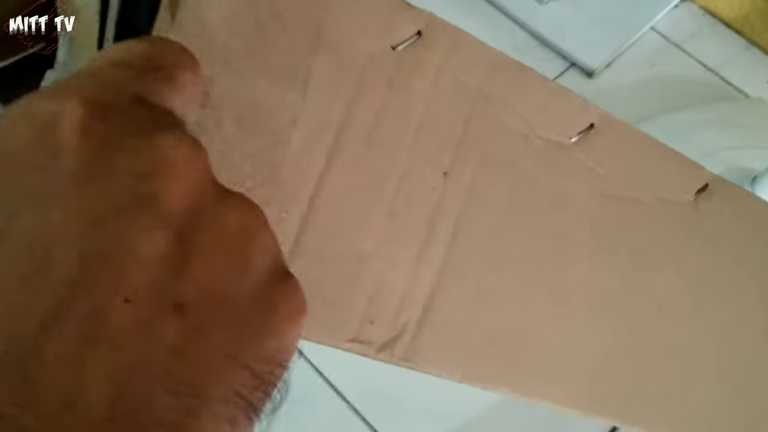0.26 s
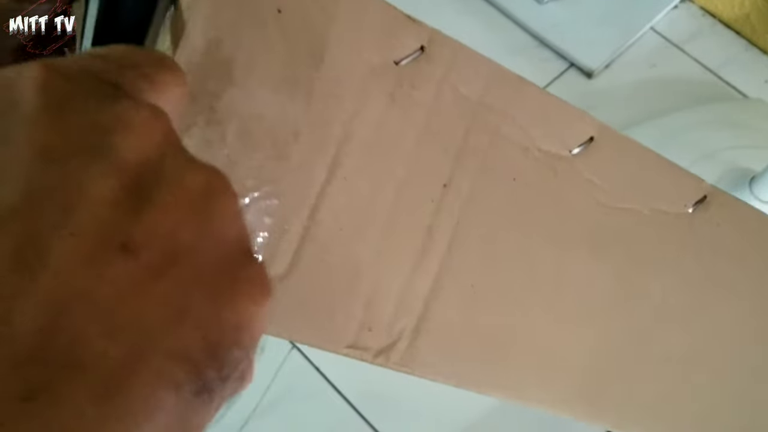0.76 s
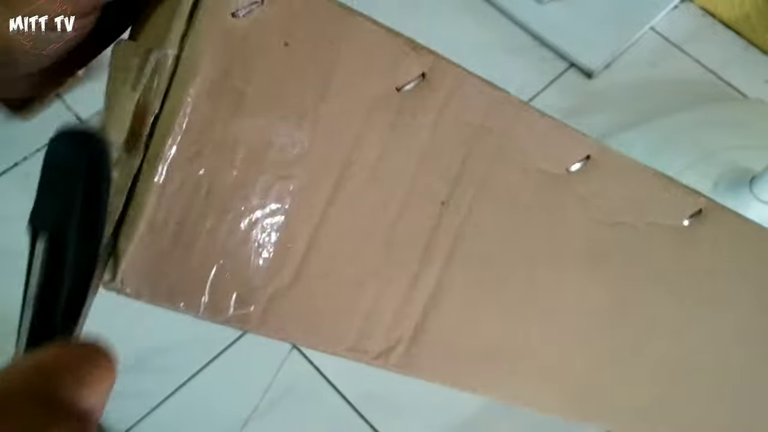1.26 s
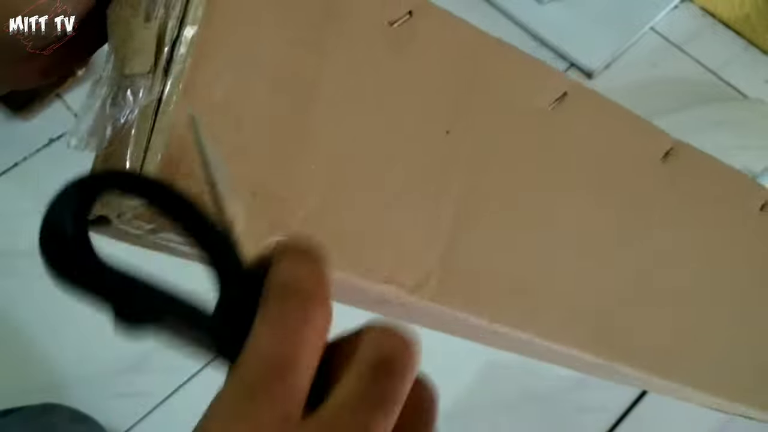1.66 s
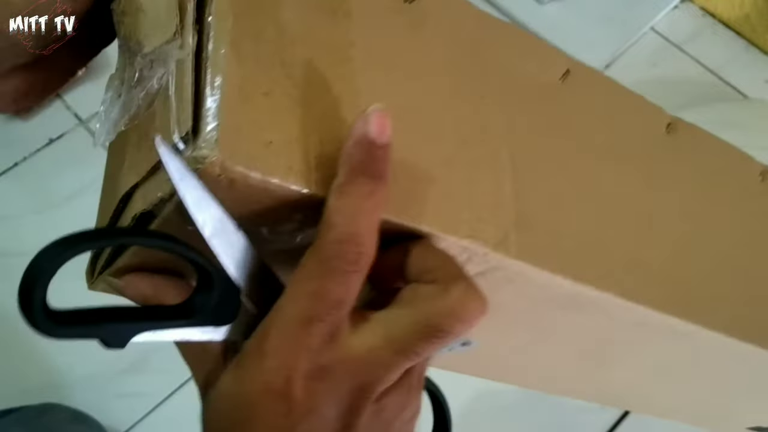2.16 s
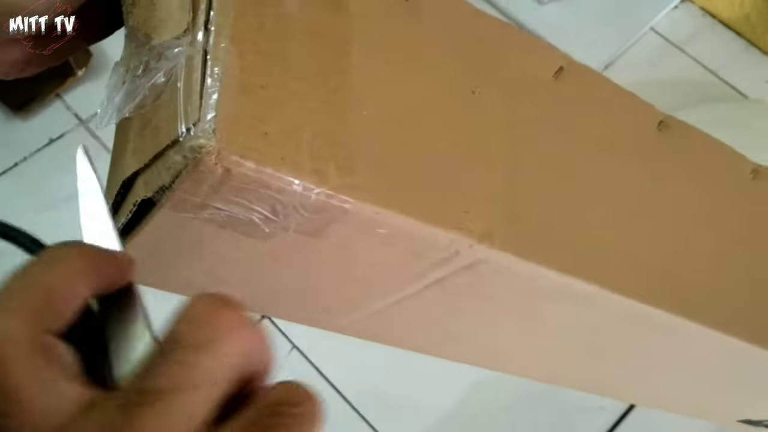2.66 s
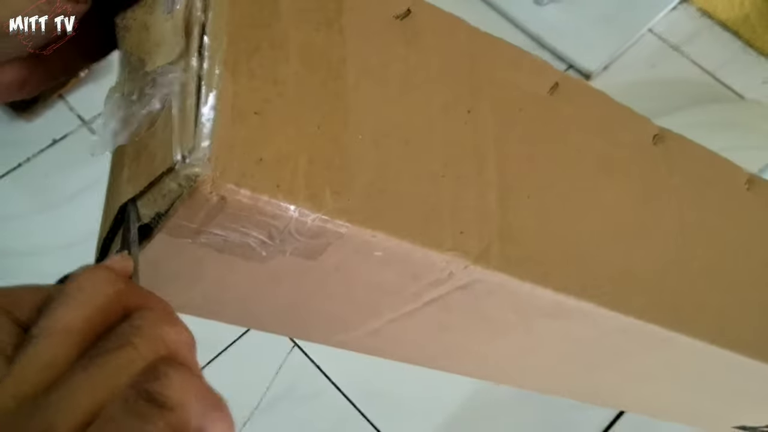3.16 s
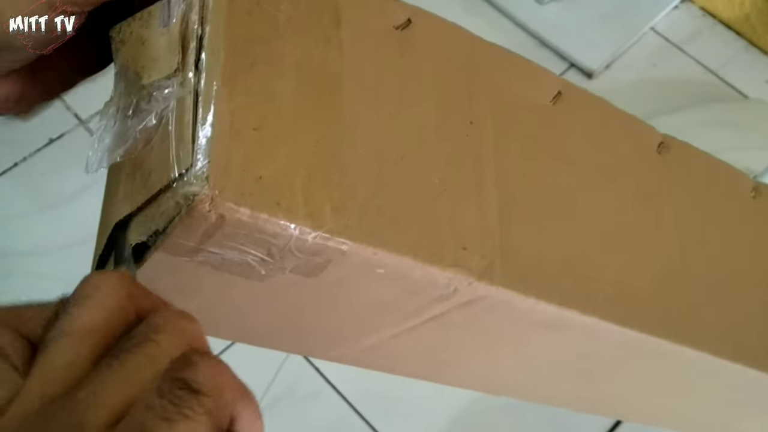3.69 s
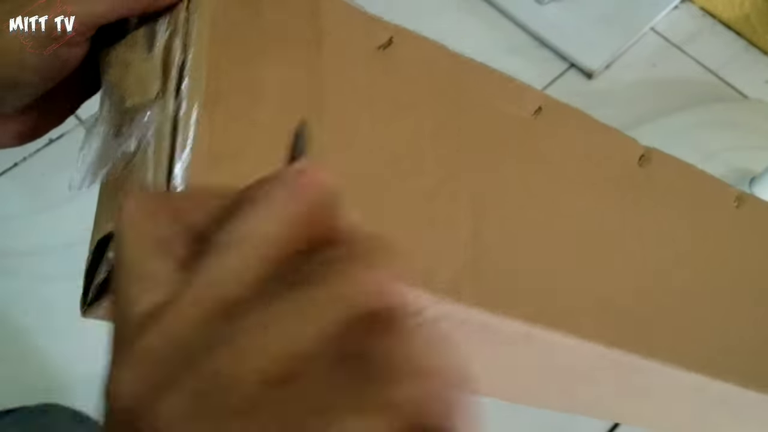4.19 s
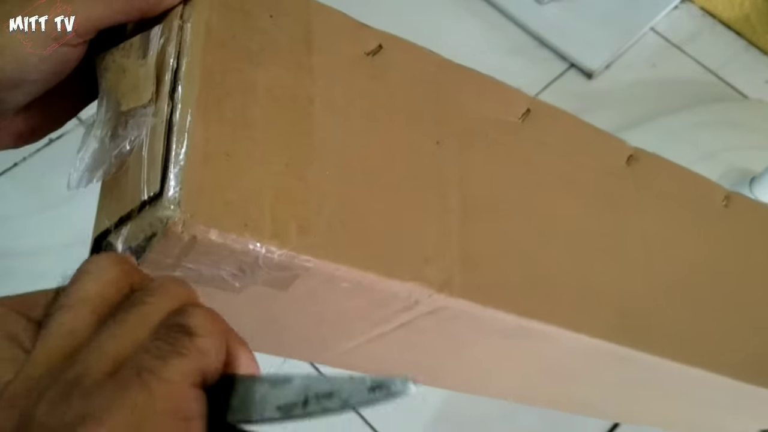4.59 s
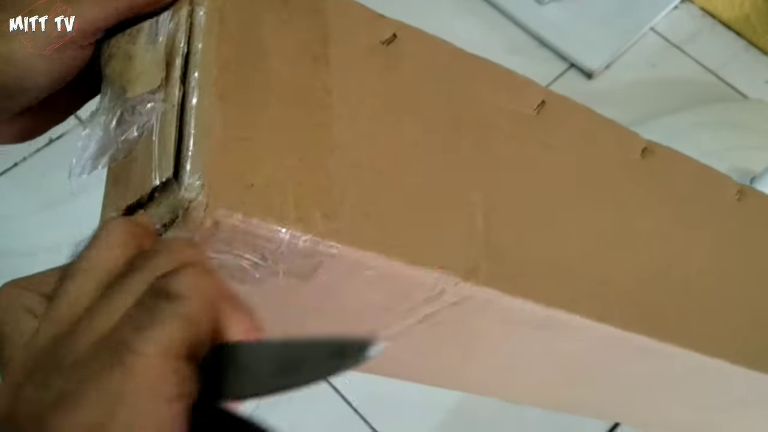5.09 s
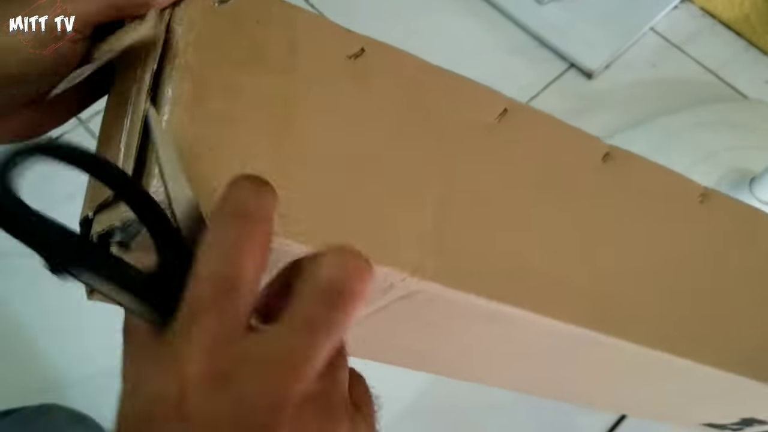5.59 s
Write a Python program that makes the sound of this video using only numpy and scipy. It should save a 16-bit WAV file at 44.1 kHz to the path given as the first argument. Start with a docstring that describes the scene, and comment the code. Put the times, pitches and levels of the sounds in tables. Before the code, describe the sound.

A close handheld microphone hears scissors working on a large, hollow taped carton in a tiled room with a short bright echo. A faint low drone, mains hum and soft hiss run throughout. Small stabs and dull rubs come at 0.3 to 0.8 s. From 0.9 to 1.45 s, quick rasping cuts bring hollow flute pops, crackling tape and a solid thump at 1.35; a sharp steel click follows at 1.5. Lighter clicks lead to a knock near 1.96, then thin crackly scratches until 2.3 and blade clicks at 2.4 and 2.75. Around 3.0 to 3.8 there are only soft bumps and scrapes. At 4.15 to 4.3 a heavy stab booms with a bright tape snap and knocks. Gentle rubs follow, with a click at 4.8 and a small split at 4.9. Another loud thump and snap hits at 5.27, then metallic clicks at 5.45 and 5.54 and a last faint scrape near 5.8.

```python
"""Slitting packing tape on a big cardboard box.

Scissors scrape along the seam in strokes of tiny slips, which rasp in the edge and boom in the hollow box.
All strokes share one envelope; their force sets the rasp, the boom and the crackle of the tape.
Noise bursts snap the tape, ringing modes make the knocks and stabs, short pulses the clicks and flute pops.
A tiled room answers with shifting echoes, over a faint drone, hum and hiss; a hand-held camera listens close."""
import sys
import numpy as np
from scipy import signal
from scipy.fft import rfft, irfft, next_fast_len
from scipy.io import wavfile
from scipy.ndimage import map_coordinates

SR = 44100
rng = np.random.default_rng(int(sys.argv[2]) if len(sys.argv) > 2 else 0)


def persist_wave(psi):
    """Save psi, clipped to +-1, as 16-bit WAV."""
    counts = np.round(np.clip(psi, -1, 1) * 32767).astype(np.int16)
    wavfile.write(sys.argv[1], SR, np.atleast_2d(counts).T)


N = 257984  # length in samples


def amp(db):
    """Decibels to gain."""
    return 10 ** (np.asarray(db) / 20)


def unit(x):
    """Scale to rms 1."""
    return x / np.sqrt(np.mean(x ** 2) + 1e-20)


def along(points, hz):
    """Read (Hz, value) points on a log frequency axis."""
    point_hz, values = np.transpose(points)
    return np.interp(np.log(hz + 1), np.log(point_hz), values)


def wobble(rate):
    """A smooth random curve with rate knots a second."""
    knots = rng.standard_normal(int(N * rate / SR) + 4)
    return map_coordinates(knots, [np.arange(N) * rate / SR])


def filtered(x, response):
    """Shape x by a complex response of frequency."""
    n = x.shape[-1]
    size = next_fast_len(n + 8192)
    return irfft(rfft(x, size) * response(np.fft.rfftfreq(size, 1 / SR)), size)[..., :n]


def softened(x, hz):
    """A soft contact passes little above hz."""
    return signal.lfilter(*signal.butter(2, hz, fs=SR), x)


def impulse(spectrum, stretch=1, size=1024):
    """The shortest causal pulse of energy 1 with this spectrum, stretched along the frequency axis."""
    hz = np.fft.rfftfreq(size, 1 / SR) / stretch
    cepstrum = irfft(np.log(amp(along(spectrum, hz))))
    # folding the cepstrum onto positive time makes the pulse minimum phase
    cepstrum[1:size // 2] *= 2
    cepstrum[size // 2 + 1:] = 0
    pulse = irfft(np.exp(rfft(cepstrum)))
    return pulse / np.linalg.norm(pulse)


def add(track, s, db, sound):
    """Mix a sound into the track at s seconds with this peak level."""
    part = track[round(s * SR):][:len(sound)]
    part += amp(db) * sound[:len(part)] / np.abs(sound).max()


def diffuse(pair, spacing):
    """Two unrelated noises become sound from all sides at two ports, spacing metres apart."""
    def turn(hz):
        return np.arccos(np.sinc(2 * hz * spacing / 343)) / 2  # 343 m/s is the speed of sound

    mid, side = filtered(pair, lambda hz: np.array([np.cos(turn(hz)), np.sin(turn(hz))]))
    return np.array([mid + side, mid - side])


# Spectrum of the low drone. Each row: frequency in Hz, relative density in dB per Hz.
DRONE_SPECTRUM = [(20, -64), (36, -15), (47, -19.5), (57, 3.5), (70, -6.5), (88, -5), (120, -15),
                  (200, -15), (400, -23.5), (800, -27.5), (2000, -34.5), (6000, -51)]
# Spectrum of the soft hiss. Each row: frequency in Hz, relative density in dB per Hz.
HISS_SPECTRUM = [(100, -7), (1000, -3), (2500, -2.5), (5000, -9), (8000, -9.5), (11000, -9.5), (15500, -7)]
# How the drone wavers. Each row: time in seconds, level in dB before the drone's trim.
DRONE_LEVEL = [(0, -52), (.62, -55.5), (.9, -50.5), (1.7, -55), (2, -51.5), (2.6, -55.5), (3.35, -57.5),
               (4.07, -54), (4.7, -55.5), (4.9, -52.5), (5.85, -53)]


def background(drone_trim_db=3, hiss_db=-64.0, hiss_follows=0.46, hum_db=-62, hum_hz=100, apart_db=-19):
    """The low, wavering drone of the room, a mains hum and a soft hiss that rises a little with the drone."""
    t = np.arange(N) / SR
    level = np.interp(t, *np.transpose(DRONE_LEVEL))
    # a little noise unrelated between the ports keeps the low drone wide
    air = diffuse(rng.standard_normal((2, N)), spacing=0.2)
    air = air + amp(apart_db) * rng.standard_normal((2, N))
    drone = unit(filtered(air, lambda hz: amp(along(DRONE_SPECTRUM, hz))))
    hiss = diffuse(rng.standard_normal((2, N)), spacing=0.29)
    hiss = unit(filtered(hiss, lambda hz: amp(along(HISS_SPECTRUM, hz))))
    hiss_gain = amp(hiss_db + hiss_follows * (level - level.mean()) + 0.5 * wobble(3.57))
    hum = unit(np.sin(2 * np.pi * hum_hz * t + 0.5 * wobble(3.17)))
    hum_gain = amp(hum_db + wobble(3.6))
    return amp(drone_trim_db + level) * drone + hiss_gain * hiss + hum_gain * hum


# How long the room rings. Each row: frequency in Hz, t60 (time to fall 60 dB) in seconds.
ROOM_DECAY = [(100, 0.63), (500, 0.53), (1500, 0.5), (4500, 0.4), (12000, 0.3)]


def echoes(tail_db=-4, early_db=-8, early_t60=0.059, gap=0.002):
    """One response of the room: early echoes off the tiles, then a tail that dies sooner in the treble."""
    hz, t, bands = signal.stft(rng.standard_normal((2, SR // 2)), SR, nperseg=256)
    decay = amp(-60 * t / along(ROOM_DECAY, hz)[:, None])
    tail = signal.istft(bands * decay, SR, nperseg=256)[1]
    t = np.arange(tail.shape[1]) / SR
    sparse = rng.random(tail.shape) < 0.05
    early = rng.standard_normal(tail.shape) * sparse * amp(-60 * t / early_t60)
    both = amp(tail_db) * tail / np.linalg.norm(tail[0]) + amp(early_db) * early / np.linalg.norm(early[0])
    return np.pad(both, ((0, 0), (round(gap * SR), 0)))


# Tone of the echoes. Each row: frequency in Hz, gain in dB.
ROOM_COLOUR = [(80, -20), (250, -1), (600, -1.5), (1500, -1.5), (4500, -1), (12000, 4.5)]


def room(x, size=8192):
    """Hand and blade keep moving, so each moment meets a new pattern of echoes."""
    wet, padded = np.zeros((2, N + 2 * SR)), np.pad(x, (0, size))
    for i in range(0, N, size // 2):  # overlapping windows cross-fade the patterns
        moment = padded[i:i + size] * np.hanning(size)
        answer = signal.fftconvolve([moment], echoes(), axes=1)
        wet[:, i:i + answer.shape[1]] += answer
    return filtered(diffuse(wet[:, :N], spacing=0.16), lambda hz: amp(along(ROOM_COLOUR, hz)))


LEAD = 8 / SR  # seconds by which direct sound reaches the right port first


def placed(x, right_db):
    """The sound reaches the right port first, and the camera shades the left one in the treble."""
    side = np.array([[-0.5], [0.5]])  # left, right

    def response(hz):
        shift = np.exp(2j * np.pi * hz * LEAD * side)
        return shift * amp(side * right_db * hz / (hz + 700))

    return filtered(x, response)


def glancing(x, db=-8, t60=0.012, lowest_hz=900):
    """Treble glances off the hand and the box face and reaches each port by its own short paths."""
    t = np.arange(SR // 80) / SR
    paths = rng.standard_normal((2, len(t))) * amp(-60 * t / t60) * (t > 2 * LEAD)
    paths /= np.linalg.norm(paths, axis=1, keepdims=True)
    near = signal.fftconvolve(x[None], paths, axes=1)[:, :N]
    return amp(db) * signal.lfilter(*signal.butter(2, lowest_hz, "highpass", fs=SR), near)


# A tap of steel on steel. Each row: frequency in Hz, relative density in dB per Hz.
STEEL_SPECTRUM = [(300, -45), (1500, 3.5), (2600, 6.5), (3800, 10.5), (5200, 2), (6800, -1.5), (9000, 0.5),
                  (11000, -2.5), (15500, -12.5)]
# The blades tap each other. Each row: time in seconds, peak level in dB,
# stretch of the spectrum as a factor (above 1 is brighter).
CLICKS = [(0.224, -47, 0.75), (1.4956, -21.5, 1.04), (1.7218, -39, 0.61), (1.8425, -34.5, 0.94),
          (2.4, -28.5, 1.18), (2.7568, -40.5, 0.96), (3.3254, -44.5, 1.05), (4.7774, -30.5, 1.4),
          (5.12, -33.5, 1.07), (5.176, -37.5, 0.83), (5.4499, -26.5, 1.36), (5.5374, -36.5, 1.2),
          (5.781, -38.5, 1.1)]


def clicks(chatter_db=-24, chatter_t60=0.012):
    """Steel taps steel; the hand damps the ring at once and the loose pivot chatters faintly."""
    out, t = np.zeros(N), np.arange(SR // 30) / SR
    for s, db, stretch in CLICKS:
        chatter = amp(chatter_db - 60 * t / chatter_t60) * rng.standard_normal(len(t))
        contact = (t == 0) + chatter
        add(out, s, db, signal.fftconvolve(contact, impulse(STEEL_SPECTRUM, stretch)))
    return out


# The blade pops through a flute of the corrugation. Each row: time in seconds, peak level in dB, pitch in Hz.
POPS = [(1.027, -49, 950), (1.104, -27.5, 1295), (1.114, -30.5, 1030), (1.2108, -28, 1085),
        (1.3503, -29, 1520), (1.4198, -34, 2400), (1.9635, -37.5, 2005)]


def pops(t60=0.015, roughness_db=-12):
    """A flute gives way in a brief crumple and its stiff wall rings hollow."""
    out, t = np.zeros(N), np.arange(SR // 20) / SR
    for s, db, hz in POPS:
        # the crumple dies twice as fast as the ring
        crumple = (t == 0) + amp(roughness_db - 60 * t / t60 * 2) * rng.standard_normal(len(t))
        ring = np.sin(2 * np.pi * hz * t) * amp(-60 * t / t60)
        add(out, s, db, signal.fftconvolve(crumple, ring))
    return out


# Modes of the box's panels and cavity. Each row: centre frequency in Hz, centre level in dB, t60 in seconds.
BOX_MODES = [(133.2, -19.5, 0.17), (189.3, -16, 0.14), (252, -10, 0.044), (350, -3.5, 0.021),
             (424, -1.5, 0.018), (538, -8.5, 0.022), (573.4, -16.5, 0.066), (685, -14, 0.052),
             (737, -24, 0.12), (860, -15.5, 0.0072), (1400, -6.5, 0.0059)]


def box_ring(scatter_db=1.5, detune=0.028):
    """The box's answer to one push; each place of contact weighs and tunes its modes anew."""
    t, ring = np.arange(SR // 5) / SR, np.zeros(SR // 5)
    for hz, db, t60 in BOX_MODES:
        decay = amp(db + scatter_db * rng.normal() - 60 * t / t60)
        ring += decay * np.cos(2 * np.pi * hz * (1 + detune * rng.normal()) * t)
    return ring / np.linalg.norm(ring)


# Blade and hand bump the box. Each row: time in seconds, peak of the thud in dB, contact brightness in Hz.
KNOCKS = [(1.046, -38, 150), (1.9637, -21.5, 1260), (2.0744, -31.5, 199), (2.4494, -30.5, 1000),
          (3.0471, -39, 1200), (3.111, -35.5, 150), (3.615, -32, 1400), (4.15, -28, 700), (4.212, -19, 144),
          (4.218, -21, 350), (4.2891, -15.5, 615), (5.258, -21.5, 124), (5.2696, -14, 1360),
          (5.288, -22, 114)]


def knocks():
    """Blade and hand bump the box; soft shoves only flex the big panels."""
    out = np.zeros(N)
    for s, thud_db, bright_hz in KNOCKS:
        add(out, s, thud_db, softened(box_ring(), bright_hz))
    return out


# Rasp of the cut edge. Each row: frequency in Hz, relative density in dB per Hz.
EDGE_SPECTRUM = [(200, -46.5), (600, -8.5), (900, 10), (1450, 7), (1900, 5), (2600, 1.5), (4000, -7.5),
                 (9000, -81.5)]
# The tip is jabbed through the liner. Each row: time in seconds, peak of the thud in dB, peak of the crunch in dB.
STABS = [(0.2943, -36.5, -46), (0.747, -43, -39.5), (0.759, -30, -43), (1.1028, -33.5, -27.5),
         (1.2111, -37, -36.5), (1.3505, -20.5, -33), (4.1733, -16, -29), (4.9012, -32, -44),
         (5.2763, -17.5, -36), (5.5683, -29, -36.5)]


def stabs(contact_hz=1000, crunch_t60=0.011):
    """The tip thumps the box and crunches briefly through the liner."""
    out, t, edge = np.zeros(N), np.arange(SR // 20) / SR, impulse(EDGE_SPECTRUM)
    for s, thud_db, crunch_db in STABS:
        add(out, s, thud_db, softened(box_ring(), contact_hz))
        crunch = amp(-60 * t / crunch_t60) * rng.standard_normal(len(t))
        add(out, s, crunch_db, signal.fftconvolve(crunch, edge))
    return out


# The blade is drawn through tape and liner. Each row: start in seconds, length in seconds,
# force in dB, tape hiss over the rasp in dB.
CUTS = [(0.571, 0.033, -57, -12), (0.943, 0.086, -44.5, -8), (1.003, 0.077, -38.5, -9),
        (1.14, 0.1, -49.5, -4.5), (1.231, 0.086, -38, -2.5), (1.307, 0.067, -41.5, -2),
        (1.403, 0.03, -51, -5.5), (1.905, 0.056, -59, 3.5), (2.127, 0.077, -49, -2.5),
        (2.201, 0.077, -50.5, -1), (2.275, 0.27, -58, -3), (2.445, 0.026, -45.5, -0.5),
        (3.095, 0.035, -52.5, -7), (3.629, 0.075, -49, -1.5), (3.734, .11, -41, -6.5),
        (4.171, 0.055, -34.5, -4), (5.25, 0.025, -44.5, 2.5), (5.797, .05, -51, -6.5)]


def crackle(count=2, over_hiss_db=3, spread_db=7.5, stretch=1.2):
    """Small splits of the tape at chance moments of every cut, as (s, peak dB, stretch)."""
    splits = []
    for s, length, force_db, tape_db in CUTS:
        for _ in range(count):
            moment = s + length * rng.beta(2, 2)
            db = force_db + tape_db + over_hiss_db + spread_db * rng.normal()
            splits.append((moment, db, stretch))
    return splits


# A split of the tape. Each row: frequency in Hz, relative density in dB per Hz.
SNAP_SPECTRUM = [(300, 9), (1500, -8), (3000, 10), (4600, 7.5), (6200, 3.5), (9000, 1), (15500, -23.5)]
# The loudest splits of the tape. Each row: time in seconds, peak level in dB,
# stretch of the spectrum as a factor (above 1 is brighter).
SNAPS = [(1.0268, -31.5, 1.8), (1.053, -37, 1.3), (1.2695, -20, 1.4), (1.273, -24.5, 2.2), (1.32, -30, 1.1),
         (2.1374, -31.5, 2), (2.251, -29.5, 2.37), (4.0932, -40, 1.5), (4.171, -26, 2.1),
         (4.1805, -18, 1.32), (4.9054, -32, 0.54), (4.939, -33.5, 1.03), (5.2722, -21, 3), (5.2768, -16, 1)]


def snaps(t60=0.0044):
    """The taut film splits in a burst a few milliseconds long."""
    out, t = np.zeros(N), np.arange(SR // 30) / SR
    for s, db, stretch in list(SNAPS) + crackle():
        split = amp(-60 * t / t60) * rng.standard_normal(len(t))
        add(out, s, db, signal.fftconvolve(split, impulse(SNAP_SPECTRUM, stretch)))
    return out


# Hand and blade slide over the box without cutting. Each row: start in seconds, length in seconds,
# force in dB, bass edge in Hz (higher near a stiff corner).
RUBS = [(0.289, .055, -50.5, 200), (0.611, 0.11, -46, 150), (0.845, 0.2, -50.5, 152),
        (2.217, 0.056, -49, 100), (3.043, 0.11, -54, 120), (4.11, 0.034, -40, 151),
        (4.138, 0.03, -30.5, 150), (4.383, 0.097, -49.5, 121), (4.621, 0.099, -45, 402),
        (4.829, 0.1, -50.5, 300), (4.91, 0.046, -37, 302), (5.248, .04, -23.5, 485), (5.797, .05, -45, 130)]
CUT_BASS_HZ = 185
# the box's boom under a firm cut, its dB per dB of force, that firm force
CUT_BOOM_DB, BOOM_GROWS, FIRM_DB = -38.5, 0.99, -38.5
RUB_RASP_DB, RUB_HISS_DB = -14.5, -18.5  # over the boom: a rub is mostly boom
SINK_S, SINK_DB, SINK_HISS_DB = 0.026, -13, -5  # sinking tip: length, force over the crunch, hiss over the rasp


def strokes():
    """Cuts, the sinking after each stab, and rubs: (start s, length s, rasp dB, boom dB, hiss dB, bass edge Hz)."""
    sinks = [(s, SINK_S, crunch_db + SINK_DB, SINK_HISS_DB) for s, _, crunch_db in STABS]
    moves = []
    for s, length, force_db, tape_db in list(CUTS) + sinks:
        boom_db = CUT_BOOM_DB + BOOM_GROWS * (force_db - FIRM_DB)
        moves.append((s, length, force_db, boom_db, force_db + tape_db, CUT_BASS_HZ))
    for s, length, force_db, bass_hz in RUBS:
        moves.append((s, length, force_db + RUB_RASP_DB, force_db, force_db + RUB_HISS_DB, bass_hz))
    return moves


GRIP_S = 0.02  # the blade bites this long before a stroke's start


def pressure(t, length, rise_share=0.28, hold_share=0.21, ends_db=-8.5, release_s=0.1):
    """Gain of one stroke, t seconds after its start: it bites, swells, holds, eases off and lets go."""
    held = rise_share + hold_share
    corners = [-GRIP_S, 0, rise_share * length, held * length, length, length + release_s]
    return amp(np.interp(t, corners, [-80, ends_db, 0, 0, ends_db, -80]))


def slips(rate, spread_db, clump_db, clump_rate):
    """Tiny stick-slip jerks, about rate a second, of uneven size and in clumps; rms 1."""
    sizes = rng.choice([-1, 1], N) * amp(spread_db * np.clip(rng.standard_normal(N), -2, 2))
    happens = rng.random(N) < rate / SR
    return unit(happens * sizes * amp(clump_db * wobble(clump_rate)))


# Fizz of the tape film. Each row: frequency in Hz, relative density in dB per Hz.
TAPE_SPECTRUM = [(800, -19), (2200, 0), (3200, 4.5), (4400, 1), (6000, -5), (9000, -4.5), (11000, -6),
                 (15000, -5)]
# a faster blade hisses more and rasps higher: log pitch per dB, pitch factor when hiss equals rasp
PITCH_PER_DB, RASP_PITCH = 0.07, 1.116


def scraping(rasp_trim_db=-2, boom_trim_db=-2, hiss_trim_db=-2, flex_db=-9, boom_hz=1100, flex_hz=120):
    """Each stroke tears fibres at the cut edge, shakes the box, flexes its big panels and makes the film fizz."""
    t, out = np.arange(N) / SR, np.zeros(N)
    fibres = slips(rate=3500, spread_db=5, clump_db=2.5, clump_rate=170)
    film = slips(rate=9000, spread_db=7, clump_db=3.0, clump_rate=260)
    tape = impulse(TAPE_SPECTRUM)
    for s, length, rasp_db, boom_db, hiss_db, bass_hz in strokes():
        near = (t > s - GRIP_S) & (t < s + length + 0.2)
        push = pressure(t[near] - s, length)
        edge = impulse(EDGE_SPECTRUM, RASP_PITCH * np.exp(PITCH_PER_DB * (hiss_db - rasp_db)))
        bass_cut = signal.butter(2, bass_hz, "highpass", fs=SR)
        box = signal.lfilter(*bass_cut, softened(box_ring(), boom_hz))
        panels = softened(box_ring(), flex_hz)
        panels = panels / np.linalg.norm(panels)
        layers = [(fibres, rasp_db + rasp_trim_db, edge),
                  (fibres, boom_db + boom_trim_db, box),
                  (film, boom_db + flex_db, panels),
                  (film, hiss_db + hiss_trim_db, tape)]
        for jerks, db, body in layers:
            out[near] += amp(db) * signal.fftconvolve(jerks[near] * push, body)[:len(push)]
    return out


def scene():
    """Box and scissors in the room: direct sound, near reflections, echoes and background."""
    card = scraping() + stabs() + knocks() + pops() + snaps()
    steel = clicks()
    direct = placed(card, right_db=5.5) + placed(steel, right_db=9.0)
    return direct + glancing(card + steel) + room(card + steel) + background()


# Treble response of the camera's ports. Each row: frequency in Hz, gain in dB.
MICROPHONE = [(6000, 0.5), (7000, -3), (8200, -9), (9200, -2.5), (10200, 0), (15000, -2.5), (15800, -24)]


def record(dry, low_hz=44, top_hz=16000):
    """The camera cuts the deep bass, its ports notch the treble, and it keeps nothing above its band limit."""
    thin = signal.sosfilt(signal.butter(4, low_hz, "highpass", fs=SR, output="sos"), dry)
    return filtered(thin, lambda hz: amp(along(MICROPHONE, hz)) * (hz < top_hz))


dry = scene()
out = record(dry)
persist_wave(out)
```